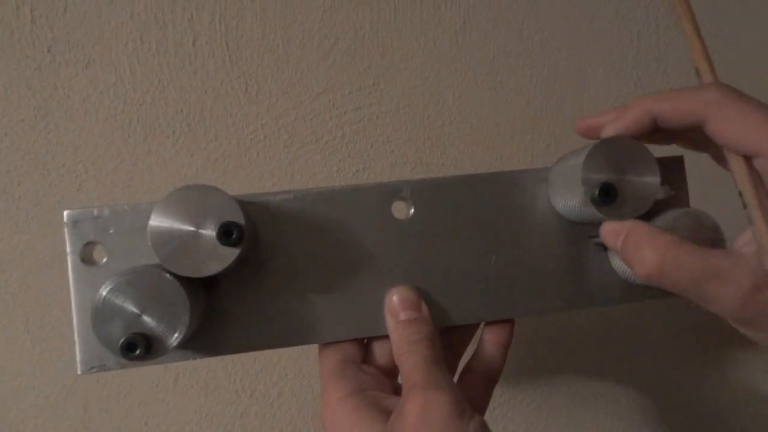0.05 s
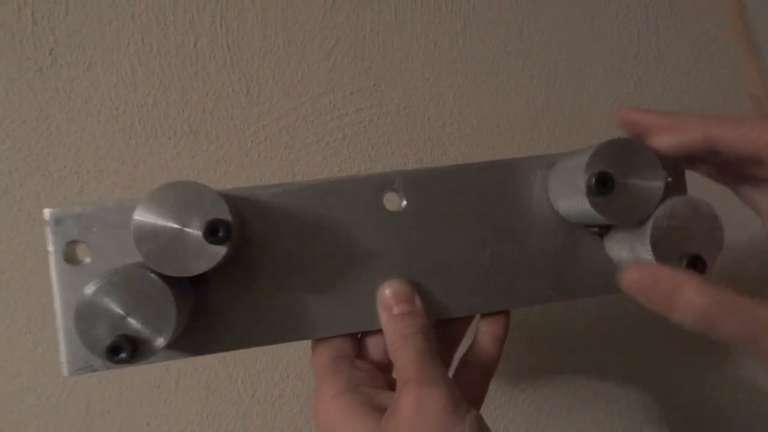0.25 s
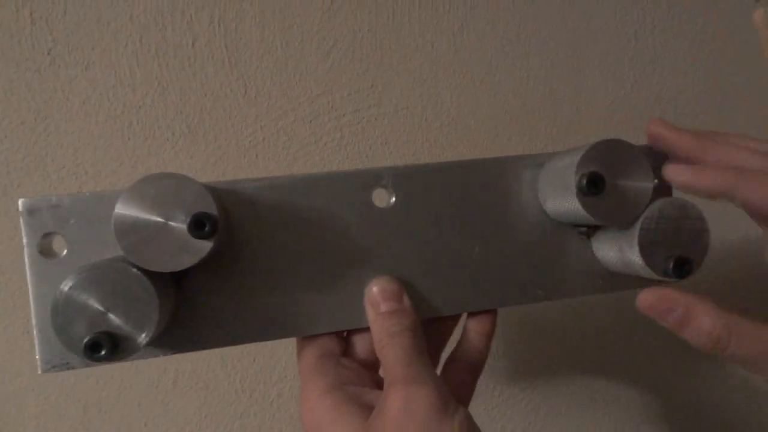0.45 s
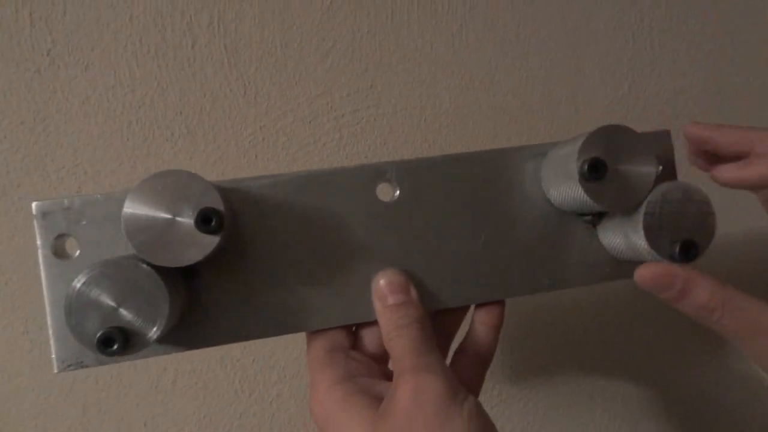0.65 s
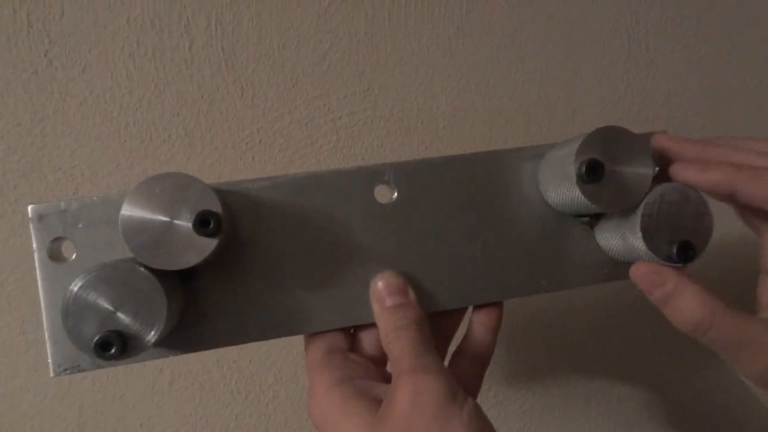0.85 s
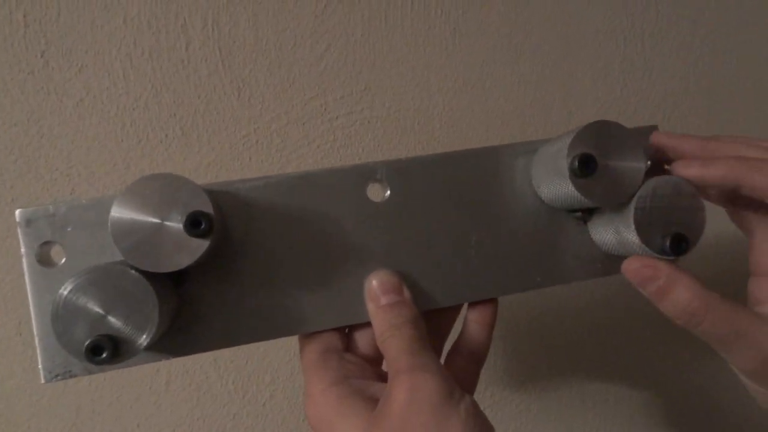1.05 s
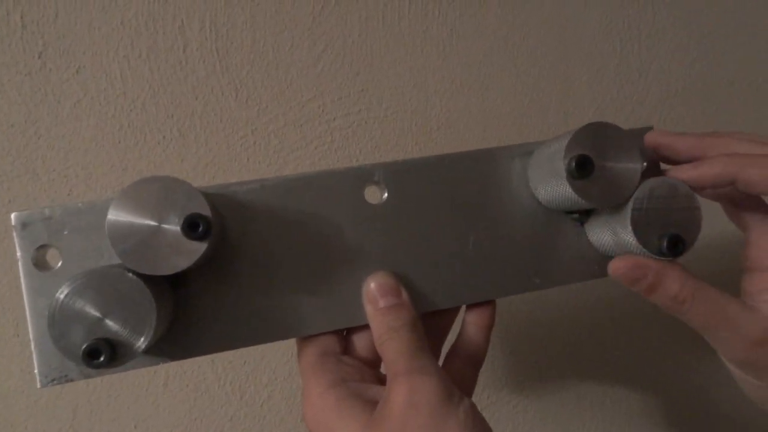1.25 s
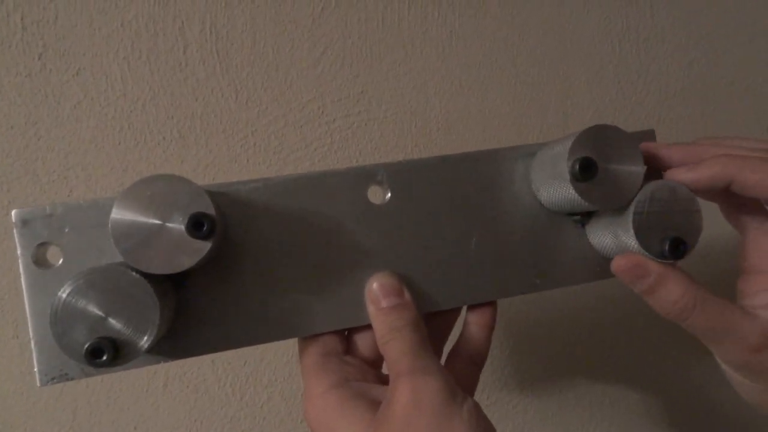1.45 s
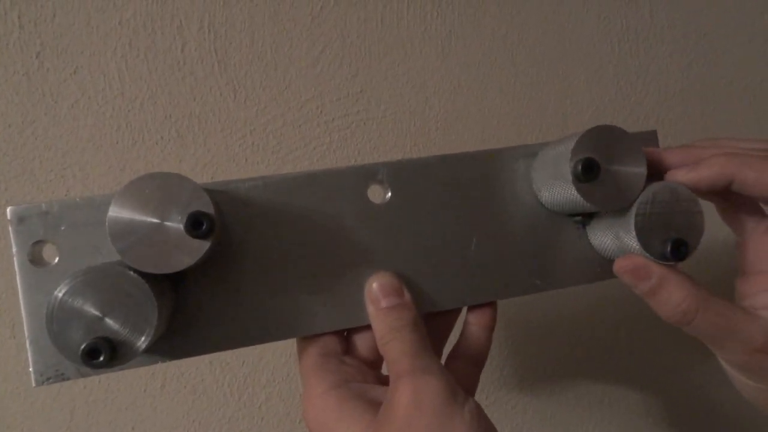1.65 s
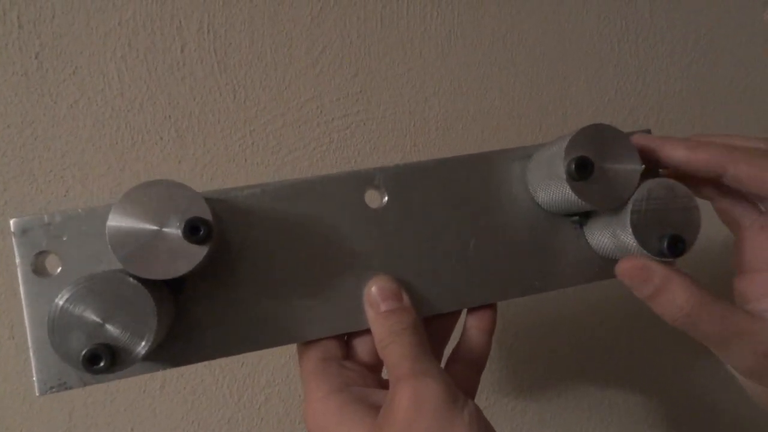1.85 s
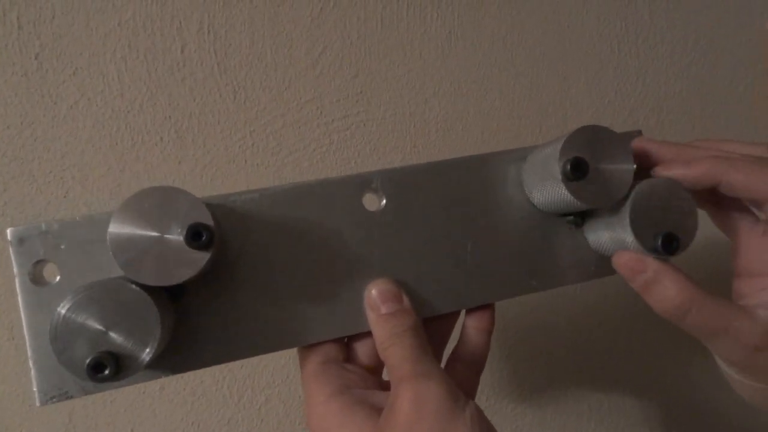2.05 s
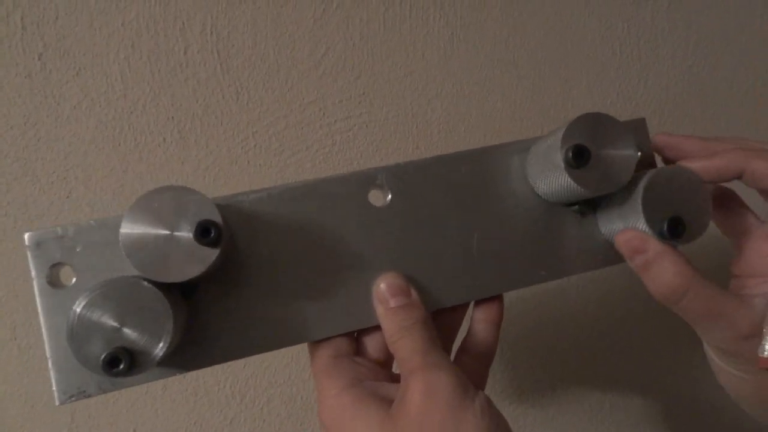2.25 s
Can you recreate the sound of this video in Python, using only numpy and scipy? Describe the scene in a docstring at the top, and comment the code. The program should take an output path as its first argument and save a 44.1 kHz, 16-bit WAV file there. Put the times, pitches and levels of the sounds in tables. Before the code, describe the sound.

A spring-loaded metal wheel scrapes free and snaps back with a bright ringing clatter, then faint ticks

```python
"""Small room: a spring-loaded metal wheel on a hand-held plate scrapes out from under a finger (stick-slip
grains), snaps back with a brief squeal (wavering sine) and chatters against its stop (noise bursts, ringing
modes); the spring sings on. Later the fingers take hold again: rubs (coloured noise), soft knocks and bright
ticks from the play in the wheels (noise and modes). A faint rustle dies away at the start; hiss and hum below."""
import sys
import numpy as np
from scipy import signal
from scipy.fft import rfft, irfft
from scipy.io import wavfile
from scipy.ndimage import uniform_filter1d

SR = 44100
rng = np.random.default_rng(int(sys.argv[2]) if len(sys.argv) > 2 else 0)


def digitize_waveform(pressure):
    """Quantize a signal to 16-bit integers and store it at the path in sys.argv[1].

    Rows of a 2-D input are taken as channels; values are limited to [-1, 1].
    """
    field = np.atleast_2d(pressure).T
    bounded = np.clip(field, -1, 1)
    quanta = np.round(bounded * 32767).astype(np.int16)
    wavfile.write(sys.argv[1], SR, quanta)


N = 101429
T = np.arange(N) / SR
LN_60_DB = np.log(1000)  # also converts a time constant to a t60
LEFT_RIGHT = np.array([[1], [-1]])  # side signal: opposite sign per channel


def undb(db):
    """Decibels to amplitude gain."""
    return 10 ** (np.asarray(db) / 20)


def unit(x):
    """Scale to rms 1."""
    return x / np.sqrt(np.mean(x ** 2))


def colour(x, points):
    """Filter by (freq_hz, gain_db) points, interpolated over log frequency."""
    points_hz, points_db = np.array(points).T
    bins_hz = np.maximum(np.arange(N // 2 + 1) * SR / N, 1)
    gain_db = np.interp(np.log(bins_hz), np.log(points_hz), points_db)
    return irfft(rfft(x) * undb(gain_db), N)


def noise(points):
    """Coloured Gaussian noise of rms 1."""
    return unit(colour(rng.standard_normal(N), points))


def fade(start_s, t60_s, hold_s=0):
    """Envelope: opens at start, holds, decays exponentially."""
    age_s = T - start_s
    decay = np.exp(-LN_60_DB * np.maximum(age_s - hold_s, 0) / t60_s)
    return (age_s >= 0) * decay


def strikes(starts_s, levels_db, t60_s):
    """Joint envelope of several blows, summed in power."""
    power = sum((undb(db) * fade(start_s, t60_s)) ** 2 for start_s, db in zip(starts_s, levels_db))
    return np.sqrt(power)


def ring(modes, starts_s, levels_db):
    """Damped sine modes set off by each blow at random phase, up to 1 s long."""
    out = np.zeros(N)
    age_s = T[:SR]
    tones = np.array([
        undb(db) * np.exp((2j * np.pi * hz - LN_60_DB / t60_s) * age_s)
        for hz, db, t60_s in modes])
    for start_s, level_db in zip(starts_s, levels_db):
        i = int(start_s * SR)
        phase = np.exp(2j * np.pi * rng.random(len(modes)))
        out[i:i + SR] += undb(level_db) * (phase @ tones).imag[:N - i]
    return out


# stereo width of the room tail: freq_hz, side_db
ROOM_WIDTH = [(400, -5), (1300, -9.5), (2400, -11), (4400, -13.5), (10000, -32.5)]
ROOM_T60_S, ROOM_TREBLE_T60_S, ROOM_BUILD_S = 0.52, 0.39, 0.0045
NEAR_T60_S = 0.012  # first reflections off hand and plate


def in_room(x, wet_db, near_db=-19):
    """Direct sound, first reflections (side only) and a diffuse tail, shorter in the treble."""
    split = signal.butter(2, 6000, fs=SR, output="sos")
    diffuse = rng.standard_normal((2, N))
    low = signal.sosfiltfilt(split, diffuse)
    tail = low * fade(0, ROOM_T60_S) + (diffuse - low) * fade(0, ROOM_TREBLE_T60_S)
    tail = tail * (1 - np.exp(-T / ROOM_BUILD_S))
    tail = tail / np.sqrt(np.sum(tail[0] ** 2))
    wet = signal.fftconvolve(x[None], tail[:, :SR], axes=1)[:, :N]
    mid, side = wet * undb(wet_db)

    near = rng.standard_normal(N) * fade(0, NEAR_T60_S)
    near = near[:SR] / np.sqrt(np.sum(near ** 2))
    reflections = undb(near_db) * signal.fftconvolve(x, near)[:N]
    return x + mid + (colour(side, ROOM_WIDTH) + reflections) * LEFT_RIGHT


# slips of the wheel before it lets go: start_s, length_s, level_db
SLIPS = [(0.161, 0.014, -39.5), (0.183, 0.0078, -39.5), (0.197, .014, -36.5)]
# scrape spectrum: freq_hz, rel_db
SCRAPE_COLOUR = [(200, -24), (500, -11.5), (900, -12.5), (1200, -4), (1600, -7.5), (2400, -3), (2800, -7.5),
                 (4700, -10.5), (5600, -7), (7300, -20.5), (8100, -8), (9000, -14.5), (10050, 2.5),
                 (11100, -8.5), (12000, -10.5), (16000, -18.5)]
SLIP_GRAINS_PER_S, SLIP_RELEASE_TAU_S = 4000, 0.0026


def scrape():
    """Stick-slip: dense random impulses, coloured, as the wheel slides free."""
    grains = (rng.random(N) < SLIP_GRAINS_PER_S / SR) * rng.standard_normal(N)
    release_t60_s = SLIP_RELEASE_TAU_S * LN_60_DB
    grip = sum(undb(db) * fade(start_s, release_t60_s, length_s) for start_s, length_s, db in SLIPS)
    return grip * unit(colour(grains, SCRAPE_COLOUR))


SQUEAL_START_S, SQUEAL_LENGTH_S, SQUEAL_RELEASE_TAU_S = 0.2118, 0.0064, 0.0015
SQUEAL_HZ, SQUEAL_DB = 9830, -13.5


def squeal(waver=0.0025):
    """Pivot friction as the wheel snaps back: a nearly pure tone of a few ms, wavering in pitch."""
    drift = unit(uniform_filter1d(rng.standard_normal(N), size=40))
    pitch_hz = SQUEAL_HZ * (1 + waver * drift)
    tone = np.sqrt(2) * np.sin(2 * np.pi * np.cumsum(pitch_hz) / SR)
    return undb(SQUEAL_DB) * tone * fade(SQUEAL_START_S, SQUEAL_RELEASE_TAU_S * LN_60_DB, SQUEAL_LENGTH_S)


RATTLE_PER_S, RATTLE_T60_S, RATTLE_POWER_SHARE = 600, 0.014, 0.43


def rattle():
    """Rough rms-1 envelope: many tiny contacts of the loose parts over a steady share of power."""
    contacts = (rng.random(N) < RATTLE_PER_S / SR) * rng.uniform(0.5, 2, N)
    power = np.abs(signal.fftconvolve(contacts, fade(0, RATTLE_T60_S)[:SR] ** 2)[:N])
    return np.sqrt(1 - RATTLE_POWER_SHARE + RATTLE_POWER_SHARE * power / power.mean())


# blows of the wheel on its stop: start_s, clatter_db, low_modes_db, high_modes_db
BLOWS = [(0.2114, -19.5, -31.5, -25.5), (0.2312, -20, -32.5, -39), (0.2362, -17.5, -25.5, -24),
         (0.2425, -18, -27, -39), (0.2545, -30, -49.5, -30), (0.2605, -23, -32.5, -29),
         (0.2715, -20.5, -33.5, -23), (0.2905, -28, -36, -34.5), (0.3020, -32, -38, -40)]
# modes of wheel and arm: freq_hz, rel_db, t60_s
WHEEL_MODES = [(2644, -19, .38), (3184, -9.5, .33), (3410, -8, 0.381), (3487, -9, .34), (4330, -10, .33),
               (4410, -11, 0.3), (5370, -14, 0.19), (5989, -15.5, 0.21), (6560, -16.5, 0.2),
               (6735, -15.5, 0.12), (7240, -14, 0.27), (8560, -16.5, .3), (9320, 1.5, 0.11),
               (9630, -9, .34), (9870, -4.5, .3), (11000, -8, .3), (12762, -11.5, .28), (14600, -11.5, .26)]
# dense short modes of plate and spring, as a spectrum: freq_hz, rel_db
CLATTER_COLOUR = [(150, -45.5), (450, -20), (1400, -19), (1650, -2), (2600, -6), (3380, 10), (3750, -6),
                  (4350, 0), (5000, -4), (5700, 0), (6250, -13), (6650, 2), (7050, -8.5), (7900, -9.5),
                  (8700, 1), (9350, 9.5), (9850, -6), (10200, -4), (12400, -3.5), (13300, -7.5),
                  (15200, -8.5), (16000, -25.5)]
HIGH_MODES_FROM_HZ = 6000
CLATTER_T60_S, CRACK_T60_S, CRACK_REL_DB = 0.1287, 0.012, -2.5


def chatter():
    """Each blow cracks, rattles plate and spring, and rings the wheel."""
    starts_s, clatter_db, low_db, high_db = np.array(BLOWS).T
    clatter = noise(CLATTER_COLOUR) * rattle() * strikes(starts_s, clatter_db, CLATTER_T60_S)
    crack = noise(CLATTER_COLOUR) * strikes(starts_s, clatter_db + CRACK_REL_DB, CRACK_T60_S)
    low = ring([m for m in WHEEL_MODES if m[0] < HIGH_MODES_FROM_HZ], starts_s, low_db)
    high = ring([m for m in WHEEL_MODES if m[0] >= HIGH_MODES_FROM_HZ], starts_s, high_db)
    return in_room(clatter + crack, wet_db=-6.5, near_db=-16) + in_room(low + high, wet_db=-18)


# thin lingering tones of the released spring: freq_hz, rel_db, t60_s
SPRING_MODES = [(3090, -3.5, 1.3), (3330, -12.5, 1.35), (3484, -0.5, 1.15)]
SPRING_DB = -45.5


def spring():
    """Lightly damped spring modes sing on faintly after the snap."""
    return ring(SPRING_MODES, [SQUEAL_START_S], [SPRING_DB])


# ticks of the wheels in their bearings: start_s, crack_db, arm_db, lower_wheel_db, upper_wheel_db
TICKS = [(2.0859, -45.5, -46.5, -60, -35), (2.1403, -37.5, -67, -33, -34), (2.1745, -40, -62, -35.5, -35.5),
         (2.2030, -49, -64, -40.5, -60), (2.2550, -45.5, -47, -35, -40), (2.261, -55, -58, -44, -56)]
# tick modes of the arm: freq_hz, rel_db, t60_s
TICK_ARM_MODES = [(4350, -5, 0.043), (4326, -1.5, 0.088), (4640, -7, 0.053)]
# lower tick modes of the wheel: freq_hz, rel_db, t60_s
TICK_LOWER_MODES = [(8630, -22, .05), (10190, -1.5, 0.019), (10290, -2.5, 0.019)]
# upper tick modes of the wheel: freq_hz, rel_db, t60_s
TICK_UPPER_MODES = [(12020, -2, 0.035), (13900, -21, .025)]
# tick crack spectrum: freq_hz, rel_db
TICK_COLOUR = [(300, 1), (1500, -10), (3500, -3), (6000, 5), (8000, -2.5), (10300, 7), (13000, -15),
               (16000, 3)]
TICK_T60_S = 0.061


def ticks():
    """Small metal-on-metal contacts: noise crack plus its own mix of arm and wheel rings."""
    starts_s, crack_db, arm_db, lower_db, upper_db = np.array(TICKS).T
    crack = noise(TICK_COLOUR) * strikes(starts_s, crack_db, TICK_T60_S)
    arm = ring(TICK_ARM_MODES, starts_s, arm_db)
    wheel = ring(TICK_LOWER_MODES, starts_s, lower_db) + ring(TICK_UPPER_MODES, starts_s, upper_db)
    return in_room(crack + arm, wet_db=-9.5) + in_room(wheel, wet_db=-18)


# soft finger knocks: start_s, thud_db, plate_ring_db
KNOCKS = [(1.818, -59.5, -53), (1.956, -56.5, -63), (2.141, -54, -54), (2.160, -50, -51),
          (2.175, -49, -49.5), (2.256, -49, -66)]
# modes of the plate: freq_hz, rel_db, t60_s
PLATE_MODES = [(1145, 1.5, 0.057), (1246, -1.5, .06)]
# thud spectrum: freq_hz, rel_db
KNOCK_COLOUR = [(100, -11.5), (280, 1.5), (480, 10), (720, -1.5), (900, 3), (1250, -11), (1700, -10),
                (2400, 0.5), (5000, -14), (9000, -10), (16000, -35)]
KNOCK_T60_S = 0.11


def knocks():
    """Fingers bump the plate: decaying noise thud, faint plate modes."""
    starts_s, thud_db, ring_db = np.array(KNOCKS).T
    thud = noise(KNOCK_COLOUR) * strikes(starts_s, thud_db, KNOCK_T60_S)
    return thud + ring(PLATE_MODES, starts_s, ring_db)


# fingers rubbing along the wheels: start_s, length_s, plate_db, wheel_db
RUBS = [(1.018, 0.096, -69.5, -90), (1.901, 0.055, -67, -73), (2.064, 0.092, -66, -61),
        (2.139, 0.055, -62, -57), (2.197, .1, -66, -63)]
# plate resonance: freq_hz, rel_db
RUB_PLATE_COLOUR = [(700, -22), (1060, -17), (1170, -0.5), (1290, -16), (1800, -34)]
# wheel resonance: freq_hz, rel_db
RUB_WHEEL_COLOUR = [(1400, -37), (2000, -3.5), (2260, 2), (2480, -11), (3300, -9), (6000, -29),
                    (12000, -49)]
RELEASE_T60_S = 0.065  # rubs and grip shifts


def rubs(rough_db=3):
    """Uneven skin friction drives two resonances, of plate and wheel."""
    plate, wheel = noise(RUB_PLATE_COLOUR), noise(RUB_WHEEL_COLOUR)
    roughness = undb(rough_db * noise([(80, 5), (300, -26), (2000, -100)]))
    strokes = sum(
        fade(start_s, RELEASE_T60_S, length_s) * (undb(plate_db) * plate + undb(wheel_db) * wheel)
        for start_s, length_s, plate_db, wheel_db in RUBS)
    return roughness * strokes


# grip shifts: start_s, length_s, level_db, centre_hz
SHIFTS = [(0.76, 0.3, -70, 88.8), (1.497, 0.164, -64, 220)]


def handling():
    """Hand shifting on the plate: soft low noise, 30 dB down two octaves off centre."""
    return sum(
        undb(db) * noise([(hz / 4, -30), (hz, 0), (hz * 4, -30)]) * fade(start_s, RELEASE_T60_S, length_s)
        for start_s, length_s, db, hz in SHIFTS)


# metallic rustle spectrum: freq_hz, rel_db
RUSTLE_COLOUR = [(1200, -16.5), (2400, 3), (3400, -1), (4200, -4.5), (6000, -4), (7600, -5.5), (8800, 3.5),
                 (10300, -5.5), (11500, -4), (12200, -4.5), (15000, -12.5)]
RUSTLE_DB, RUSTLE_T60_S = -55.5, 0.3


def rustle():
    """Faint metallic noise dying away exponentially from the start."""
    return undb(RUSTLE_DB) * noise(RUSTLE_COLOUR) * fade(0, RUSTLE_T60_S)


# room tone spectrum: freq_hz, rel_db (per Hz)
AIR_COLOUR = [(20, -15), (40, -14.5), (56, -0.5), (85, -7.5), (118, 1), (147, -8.5), (200, -5), (260, -12),
              (450, -13.5), (1100, -19), (1600, -22), (3500, -26.5), (16000, -35.5)]
# room tone stereo width: freq_hz, side_db
AIR_WIDTH = [(60, -20.5), (120, -14), (200, -4.5), (400, 1), (1300, 2.5), (4400, -4), (8000, -7.5),
             (15000, -31)]
AIR_DB, HUM_HZ, HUM_DB = -56.5, 123.3, -62.5


def room_tone(waver=0.43):
    """Wide low rumble and hiss, plus a sine hum of slowly wavering level."""
    side = colour(noise(AIR_COLOUR), AIR_WIDTH)
    air = noise(AIR_COLOUR) + side * LEFT_RIGHT
    hum_level = 1 + waver * noise([(4, -12), (30, -33.5), (200, -120)])
    hum = np.sqrt(2) * np.sin(2 * np.pi * HUM_HZ * T) * hum_level
    return undb(AIR_DB) * air + undb(HUM_DB) * hum


def scene():
    """Snap, fingers, rustle and room tone summed in stereo."""
    snap = in_room(scrape(), wet_db=3)
    snap = snap + in_room(squeal(), wet_db=-11, near_db=-15)
    snap = snap + chatter() + in_room(spring(), wet_db=-19.5)
    fingers = ticks() + in_room(knocks() + rubs(), wet_db=-10) + handling()
    return snap + fingers + rustle() + room_tone()


OVERLOAD = 0.746  # ceiling of the microphone's soft clipping, full scale = 1
TOP_HZ = 15900


def record(dry):
    """Tanh rounds the loudest peaks; a steep elliptic low-pass cuts the top."""
    soft = OVERLOAD * np.tanh(dry / OVERLOAD)
    low_pass = signal.ellip(10, 0.2, 70, TOP_HZ, fs=SR, output="sos")
    return signal.sosfilt(low_pass, soft)


dry = scene()
out = record(dry)
digitize_waveform(out)
```